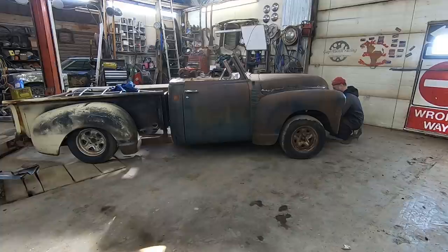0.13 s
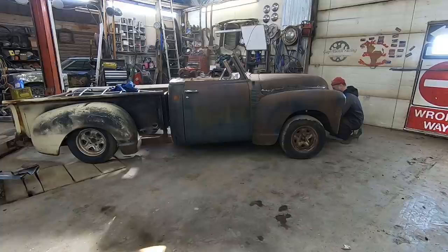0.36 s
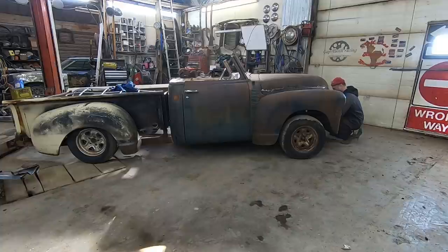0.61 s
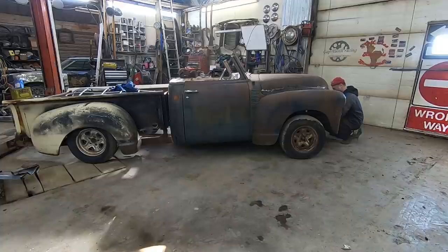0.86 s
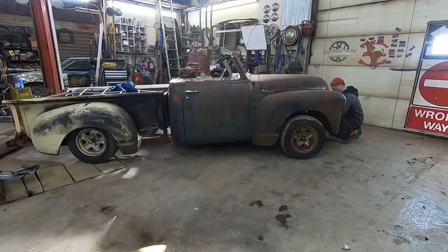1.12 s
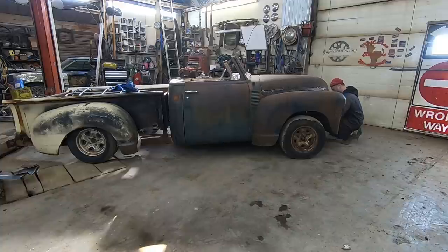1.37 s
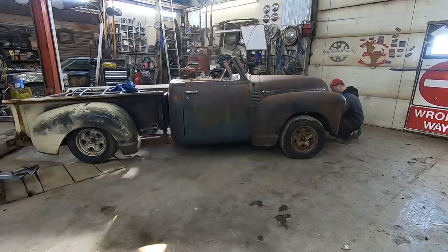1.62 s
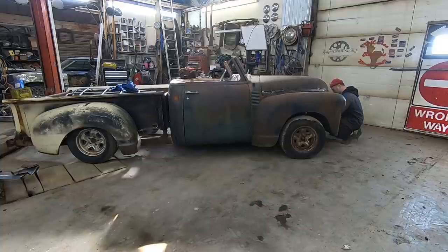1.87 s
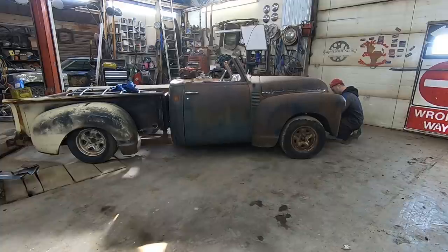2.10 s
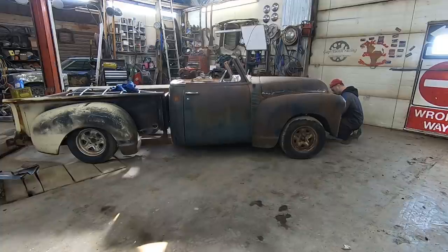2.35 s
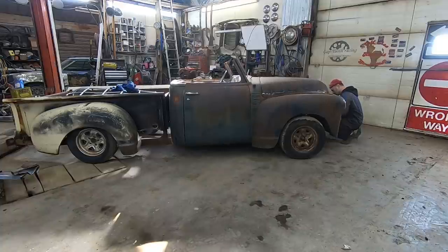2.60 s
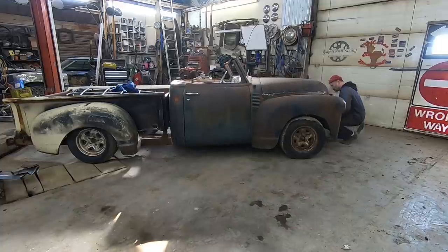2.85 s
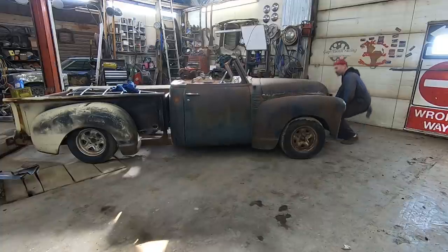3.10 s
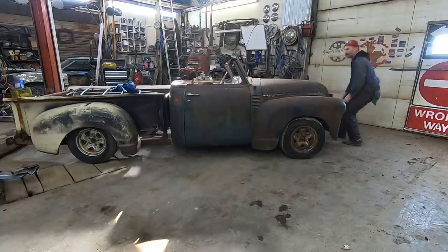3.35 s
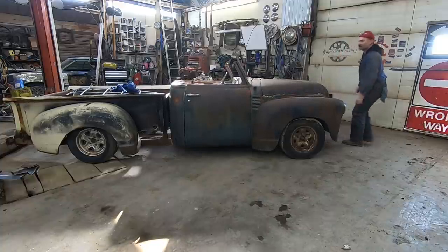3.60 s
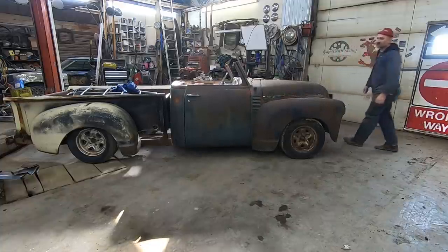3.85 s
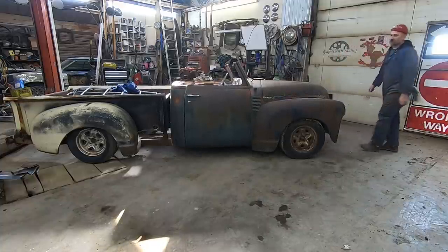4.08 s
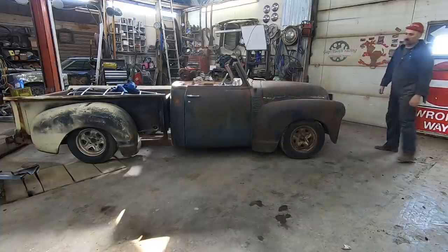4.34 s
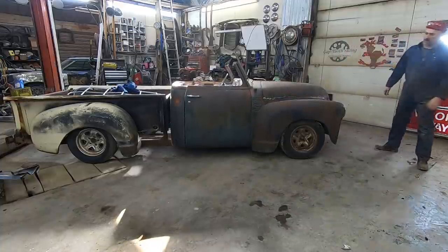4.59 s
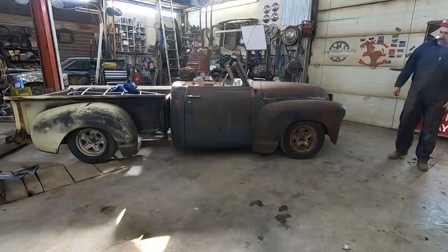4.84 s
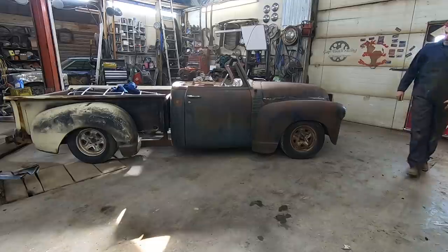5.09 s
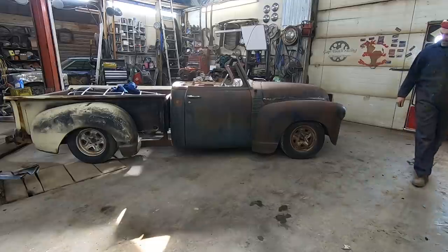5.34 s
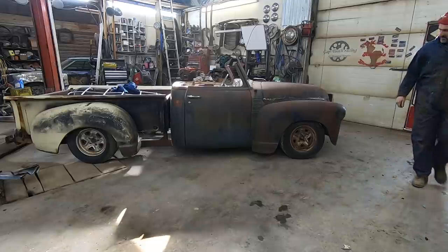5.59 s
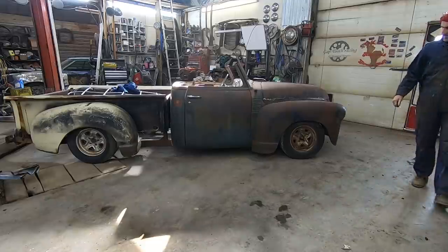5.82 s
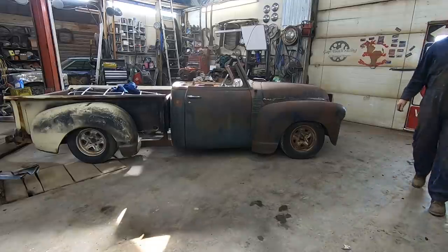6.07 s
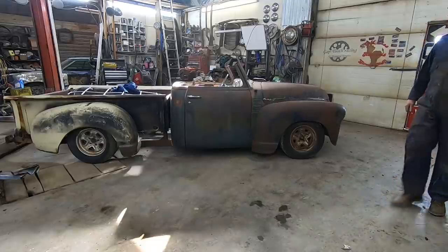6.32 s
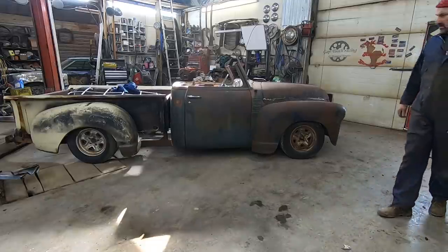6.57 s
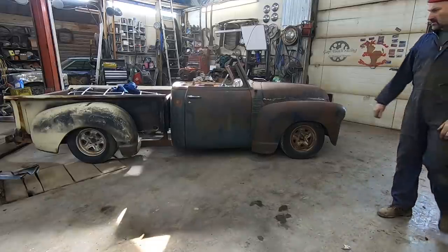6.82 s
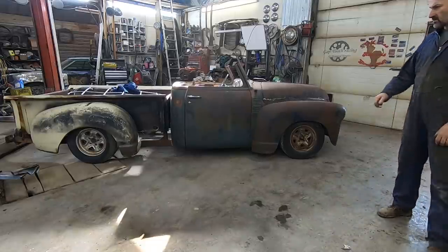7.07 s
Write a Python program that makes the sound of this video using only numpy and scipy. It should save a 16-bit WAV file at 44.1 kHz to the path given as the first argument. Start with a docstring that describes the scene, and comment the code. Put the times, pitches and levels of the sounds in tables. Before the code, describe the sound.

A slow fan hums, then a sudden squeak and knocks release a harsh rush of air as a truck sinks, hissing away beneath a few boot thuds.

```python
"""In a concrete workshop a slow fan hums behind the microphone's quiet, until at 0.78 s a valve snaps open.
Air squeaks through the opening gap amid dull knocks, then hisses out of a truck's suspension bags: shaped noise
that gushes deeper as the body sinks, until 2.2 s, and carries a faint edge tone. Boots thud near the microphone,
something is dragged over the floor at about 6 s as ringing slips, and the hiss thins out to the end.
Echo joins all but the background; a gain control ducks under the hiss and recovers slowly."""
import sys
import numpy as np
from scipy import signal
from scipy.io import wavfile
from scipy.ndimage import uniform_filter1d

SR = 44100
rng = np.random.default_rng(int(sys.argv[2]) if len(sys.argv) > 2 else 0)


def output_pcm(signal):
    """Save a mono or channel-first signal as 16-bit PCM at the path in sys.argv[1].

    Samples are clipped to [-1, 1] before scaling.
    """
    pcm = np.clip(np.atleast_2d(signal).T, -1, 1) * 32767
    wavfile.write(sys.argv[1], SR, np.round(pcm).astype(np.int16))


def linear_from_db(decibels):
    """Turn decibels (scalar or array-like) into linear amplitude factors; 0 gives 1."""
    return 10 ** (np.asarray(decibels, float) / 20)


N = 317079
FRAMES, HZ = N // 256 + 5, np.fft.rfftfreq(1024, 1 / SR)[:, None]  # short-time spectra, 256 samples apart

# Strength of the jet. Each row: time in seconds, relative level in dB.
JET_LEVEL = [(.79, -18.5), (.9, -13), (1.3, -13.5), (1.56, -14), (1.73, -13.5), (1.9, -14.5), (2.16, -18),
             (2.4, -18.5), (3.68, -18), (4.2, -18.5), (5.37, -20.5), (5.7, -23), (6, -25), (6.3, -28),
             (7.19, -34.5)]
# Spectrum of the jet. Each row: frequency in Hz, relative power density in dB.
JET_SPECTRUM = [(60, -45), (133, -20), (513, -20), (834, -16), (1620, -11), (2940, -9.5), (5460, -5),
                (7610, -5), (8950, -0.5), (10800, -16.5), (12200, -13), (13500, -21.5), (15000, -29),
                (15900, -42)]
# Changing colour of the jet. Each row: time in seconds, dullness in dB per octave under the pivot,
# lift of the top band in dB.
JET_SHADE = [(.82, -7, -5), (1.0, -2.5, 1), (1.4, 0, -1.5), (1.75, -0.5, -1.5), (1.92, 0.5, -4),
             (2.2, 1.7, 2.5), (2.5, -0.45, 1.5), (5, -0.88, 2), (7.19, 0, 0)]
# Lower body of the jet once the truck has settled. Each row: time in seconds, relative level in dB, centre in Hz.
JET_BODY = [(2.45, -26.5, 2980), (2.7, -26, 3160), (3.9, -24, 3340), (5.1, -26, 3300), (6.3, -27, 3830),
            (7.19, -35.5, 3280)]
# Deeper gushes as the bags fold. Each row: start of the hold in seconds, hold in seconds,
# relative level in dB, centre at that start in Hz.
BAG_GUSHES = [(0.78, 0.15, -26.5, 1960), (1.115, 0.066, -29, 1640), (1.449, 0.017, -16.5, 2500),
              (1.893, 0.11, -16.5, 2070), (2.094, 0.09, -18.5, 1590)]
# Edge tone of the nozzle, a bump on the hiss. Each row: time in seconds, lift in dB, frequency in Hz.
EDGE_TONE = [(.8, 0, 6300), (1.55, 1, 6200), (1.95, 1.5, 5700), (2.5, 4, 5550), (3.2, 2.5, 5450),
             (4.2, 2.5, 5400), (5.2, 0, 5600)]
# Swells of a narrow band of the hiss. Each row: middle in seconds, half length in seconds,
# lift in dB, frequency in Hz.
HISS_FLARES = [(1.65, .06, 5, 6100), (1.82, .07, 4, 5900), (5.4, .25, 3, 6500), (6.4, .6, 4.5, 3440)]
# First air through the opening gap. Each row: start in seconds, end in seconds, level in dB, frequency in Hz.
GAP_SQUEAKS = [(.778, .805, -21.5, 1560), (.779, .786, -24, 4450), (.789, 0.821, -22, 4865),
               (0.806, 0.82, -27, 1707), (0.831, 0.985, -33, 1618)]
# Dull knocks of chassis and boots. Each row: time in seconds, strength in dB, settled pitch in Hz,
# time to fall 60 dB in seconds.
KNOCKS = [(.774, -21.5, 170, 0.11), (0.811, -20.5, 109, 0.064), (0.831, -25.5, 236, 0.14),
          (0.871, -23, 178, 0.076), (1.045, -31, 231, 0.21), (1.859, -31, 231, 0.36),
          (1.915, -26.5, 151, 0.21), (1.929, -26, 298, 0.11), (4.022, -32.5, 129, 0.1),
          (6.03, -28, 194, 0.094), (6.479, -31, 187, 0.11), (6.602, -30.5, 183, 0.08),
          (7.169, -42, 390, 0.11)]
# Pulls of something over the floor. Each row: start of the hold in seconds, level in dB.
DRAG_PULLS = [(5.84, -37.5), (6.02, -44.5)]
# Modes of the dragged object. Each row: frequency in Hz, width in Hz, relative level in dB.
DRAG_MODES = [(330, 50, -7), (440, 24, -1), (622, 26, 0), (1010, 70, -11), (180, 70, -10)]
# Tones of the fan. Each row: multiple of the shaft rate, mean level in dB over the hum level.
FAN_ORDERS = [(1, 1), (2, -1.5), (3, -4), (5, -13), (6, -10.5)]
# Rumble around the fan tones. Each row: frequency in Hz, relative power density in dB.
FAN_RUMBLE = [(15, -34), (30, 1), (80, -19), (100, -8), (150, 1.5), (250, -25), (400, -39)]
# Still air of the workshop. Each row: frequency in Hz, relative power density in dB.
ROOM_AIR = [(130, -8.5), (220, -12), (400, -9), (520, -15), (700, -9.5), (1300, -10), (2200, -16.5),
            (2900, -17), (6000, -19), (8900, -10.5), (10800, -25), (12300, -30), (15800, -57)]
# Echo of the workshop. Each row: frequency in Hz, time to fall 60 dB in seconds.
ROOM_ECHO = [(100, 1.0), (500, 0.89), (2000, 0.25), (8000, 0.74), (15000, 0.12)]
# Likeness of the two microphone ports. Each row: frequency in Hz, correlation (1 is alike).
PORT_LIKENESS = [(60, 0.44), (130, 0.89), (290, 0.96), (640, 0.52), (1410, 0.15), (3100, 0.78),
                 (6820, 0.26), (15000, -0.45)]
# Phase between the ports. Each row: frequency in Hz, lead of the left in radians.
PORT_LEAD = [(100, -0.5), (600, -0.14), (3300, -0.17), (4600, 0.6), (5200, -0.34), (7000, -1.23),
             (10000, -2.16), (15000, -1.5)]
# Balance of the ports. Each row: frequency in Hz, left over right in dB.
PORT_BALANCE = [(200, -0.5), (700, -2), (1300, -2), (2400, -3.5), (4400, -1), (6500, 1), (8800, -5.5),
                (11000, -2), (15000, 3.5)]


def evened(x):
    """Scales to rms 1."""
    return x / np.sqrt(np.mean(x ** 2) + 1e-20)


def unit(db):
    """Turns a spectrum in dB to gains whose power sums to 1."""
    gain = linear_from_db(db)
    return gain / np.sqrt((gain ** 2).sum(0))


def read(points, hz):
    """Reads a table on a log-frequency axis."""
    f, value = np.transpose(points)
    return np.interp(np.log(hz + 1), np.log(f + 1), value)


def columns(rows, t):
    """Reads every column of a curve at the times t."""
    s, *rest = np.transpose(rows)
    return [np.interp(t, s, column) for column in rest]


def add(mix, s, sound):
    """Mixes a sound in at time s."""
    part = mix[round(s * SR):][:len(sound)]
    part += sound[:len(part)]


def slopes(t, start, hold, rise_db_per_s, fall_db_per_s):
    """Decibels under the top: a straight rise, a hold, a straight fall."""
    rise_db = -rise_db_per_s * np.clip(start - t, 0, None)
    return rise_db - fall_db_per_s * np.clip(t - start - hold, 0, None)


def resonate(x, hz, width):
    """Shifts hz down to zero, smooths, and shifts back: a resonance of gain 1."""
    turn = np.exp(2j * np.pi * np.cumsum(hz * np.ones(len(x))) / SR)
    r = np.exp(-np.pi * width / SR)
    return 2 * (turn * signal.lfilter([1 - r], [1, -r], x / turn + 1e-18)).real


def drift(low_hz, top_hz, t):
    """Slow random wandering of rms 1, a sum of sines at random phases."""
    rates = np.geomspace(low_hz, top_hz, num=30)
    return evened(sum(np.sin(2 * np.pi * (f * t + rng.random())) / np.sqrt(f) for f in rates))


def broad(hz):
    """A broad hump of noise around hz, 6 dB down about an octave away."""
    return unit(-6 * abs(np.log2((HZ + 30) / hz)) ** 1.84)


def stereo_noise(gain, patchy_db):
    """Random short-time spectra with drifting patches, partly alike at the two microphone ports."""
    a, b, c, d, patches = rng.standard_normal((FRAMES, len(HZ), 5)).T
    patches = evened(uniform_filter1d(uniform_filter1d(patches, 14, 0), 12, 1))
    same = np.clip(read(PORT_LIKENESS, HZ), -1, 1)
    left = a + 1j * b
    right = same * left + np.sqrt(1 - same ** 2) * (c + 1j * d)
    right = right * np.exp(-1j * read(PORT_LEAD, HZ))
    lean = linear_from_db(read(PORT_BALANCE, HZ) / 2)
    z = np.array([left * lean, right / lean]) * gain * linear_from_db(patchy_db * patches)
    return signal.istft(z, nperseg=1024, noverlap=768)[1][:, :N]


def tone_band(hz):
    """A narrow bump of the spectrum, down to 1/e at 300 Hz either side."""
    return np.exp(-((HZ - hz) / 300) ** 2)


def jet():
    """Turbulent hiss, body and gushes add in power, lifted at the edge tone; the flow flutters and starts at once."""
    valve_s, pivot_hz = 0.778, 6860
    t = np.arange(FRAMES) * 256 / SR
    dull, sizzle_db = columns(JET_SHADE, t)
    top = np.clip(HZ / 1500 - 6.3, 0, 1)  # fades in from 9450 to 10950 Hz
    tilt_db = dull * np.log2(pivot_hz / np.clip(HZ, 300, None))
    hiss = unit(read(JET_SPECTRUM, HZ)) * linear_from_db(columns(JET_LEVEL, t)[0] + sizzle_db * top + tilt_db)

    body_db, body_hz = columns(JET_BODY, t)
    power = hiss ** 2 + (broad(body_hz) * linear_from_db(body_db)) ** 2
    for start, hold, db, hz in BAG_GUSHES:
        # the centre sags at 7.6 octaves per second squared, by two octaves at most
        centre_hz = hz * 2 ** -np.minimum(7.6 * np.clip(t - start, 0, None) ** 2, 2)
        gush_db = db + slopes(t, start, hold, rise_db_per_s=138, fall_db_per_s=114)
        power = power + (broad(centre_hz) * linear_from_db(gush_db)) ** 2

    tone_db, tone_hz = columns(EDGE_TONE, t)
    lift_db = tone_db * tone_band(tone_hz)
    for s, half, db, hz in HISS_FLARES:
        lift_db = lift_db + db * tone_band(hz) * np.exp(-((t - s) / half) ** 2)
    flutter_db = 0.3 * drift(2, 12, t)
    flow = np.sqrt(power) * linear_from_db(lift_db + flutter_db)
    opened = 1 - np.exp(-np.clip(np.arange(N) / SR - valve_s, 0, None) / 0.0055)
    return stereo_noise(flow, patchy_db=0.59) * opened


def valve():
    """The first air squeaks through the still narrow gap: short sines of rough loudness."""
    out = np.zeros(N)
    for start, end, db, hz in GAP_SQUEAKS:
        t = np.arange(0, end - start, 1 / SR)
        rough = 1 + 0.3 * evened(resonate(rng.standard_normal(SR // 5), 90, 200))[-len(t):]
        tone = np.sin(2 * np.pi * hz * t) * signal.windows.tukey(len(t), 0.2)
        add(out, start, linear_from_db(db) * rough * tone)
    return out


def thuds():
    """Each knock is a short swing that drops in pitch, with a puff of low noise."""
    out = np.zeros(N)
    t = np.arange(SR // 4) / SR
    for s, db, hz, t60 in KNOCKS:
        swing = np.sin(2 * np.pi * hz * (t + 0.004 * (1 - np.exp(-t / 0.01))))  # from 1.4 hz down to hz
        puff = rng.standard_normal(len(t))
        puff = evened(resonate(resonate(puff, 0.85 * hz, 170), 1.56 * hz, 500))
        envelope = linear_from_db(db - 60 * t / t60) * np.minimum(t / 0.015, 1)
        add(out, s - 0.005, envelope * (swing + 0.85 * puff))  # the swell begins 5 ms ahead
    return out


def scuff():
    """Uneven slips, about 900 a second, ring the modes of the object dragged over the floor."""
    t = np.arange(DRAG_PULLS[0][0] - 0.15, DRAG_PULLS[-1][0] + 0.3, 1 / SR)
    slips = (rng.random(len(t)) < 900 / SR) * rng.standard_normal(len(t))
    ring = 0
    for hz, width, db in DRAG_MODES:
        mode = resonate(resonate(slips, hz, width), hz, 3 * width)
        ring = ring + linear_from_db(db) * evened(mode)
    pull = sum(linear_from_db(db + slopes(t, s, hold=0.045, rise_db_per_s=260, fall_db_per_s=120)) for s, db in DRAG_PULLS)
    out = np.zeros(N)
    add(out, t[0], evened(ring) * pull)
    return out


def background():
    """Shaft orders of a slow fan, throbbing unevenly, with its rumble and the still air of the workshop."""
    fan_hz, throb_hz = 24.2, 4.3  # mean shaft rate and mean belt flap
    hum_db, rumble_over_hum_db, air_db = -50, -5.5, -53.5
    t = np.arange(N) / SR

    def wander(low_hz, top_hz):
        """Slow drift, drawn every 256 samples."""
        return np.interp(t, t[::256], drift(low_hz, top_hz, t[::256]))

    turns = np.cumsum(fan_hz * (1 + 0.017 * wander(1.2, 4.6))) / SR
    throb = 2 * np.pi * throb_hz * t + 1.4 * wander(0.278, 0.81)
    fan = 0
    for k, db in FAN_ORDERS:
        swing_db = 3.6 * np.sin(throb + 2.28 * k) + 3.7 * wander(1.7, 12)
        fan = fan + linear_from_db(db + swing_db) * np.sin(2 * np.pi * (k * turns + rng.random()))
    rumble = evened(stereo_noise(linear_from_db(read(FAN_RUMBLE, HZ)), patchy_db=4.0))
    air = evened(stereo_noise(linear_from_db(read(ROOM_AIR, HZ)), patchy_db=1.4))
    return linear_from_db(hum_db) * (fan + linear_from_db(rumble_over_hum_db) * rumble) + linear_from_db(air_db) * air


def shop(x):
    """Workshop echo: sparse taps of random sign, one in every 20 samples, each band dying at its own speed."""
    taps = np.zeros((2, SR))
    slots = np.arange(300, SR - 20, 20)
    at = slots + rng.integers(0, 20, (2, len(slots)))
    np.put_along_axis(taps, at, rng.choice([-1., 1.], at.shape), 1)
    taps[1] = (taps[0] + taps[1]) / np.sqrt(2)  # the ports sit close together
    hz, t, z = signal.stft(taps, SR, nperseg=256)
    decay_db = -60 * t / read(ROOM_ECHO, hz)[:, None]
    tail = signal.istft(z * linear_from_db(decay_db), SR, nperseg=256)[1]
    return signal.fftconvolve(x, tail / np.linalg.norm(tail[0]), axes=1)[:, :N]


def scene():
    """Everything but the background gets the workshop's echo; the near knocks and scuffs get less of it."""
    hiss, squeaks, near = jet(), valve(), thuds() + scuff()
    echo = shop(linear_from_db(-4) * squeaks + linear_from_db(-5.5) * hiss + linear_from_db(-14) * near)
    return squeaks + hiss + near + echo + background()


def top_cut(x):
    """Nothing passes above the cut-off."""
    return signal.sosfilt(signal.butter(12, 15790, fs=SR, output="sos"), x)


def record(dry):
    """The microphone's gain control falls fast with the loudness and recovers slowly."""
    knee_db, duck_share, smooth_s = -30, 0.39, 0.037
    fall_db = np.arange(N) * 1.5 / SR  # the held loudness sinks by 1.5 dB per second
    r = np.exp(-1 / (smooth_s * SR))
    power = signal.lfilter([1 - r], [1, -r], (dry ** 2).mean(0))
    power_db = 10 * np.log10(power + 1e-12)
    held_db = np.maximum.accumulate(power_db + fall_db) - fall_db
    over_db = signal.lfilter([1 - r], [1, -r], np.maximum(held_db - knee_db, 0))
    mix = dry / linear_from_db(duck_share * over_db)
    return top_cut(mix)


dry = scene()
out = record(dry)
output_pcm(out)
```